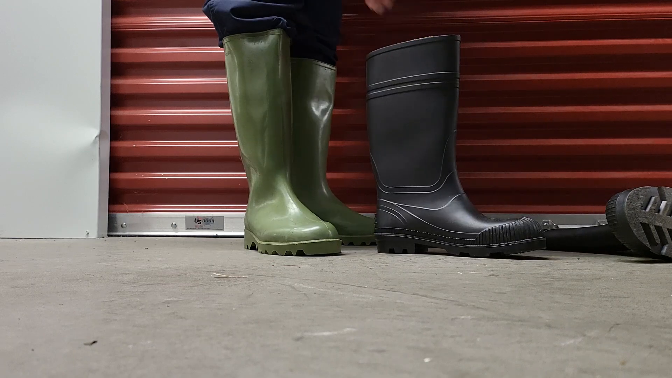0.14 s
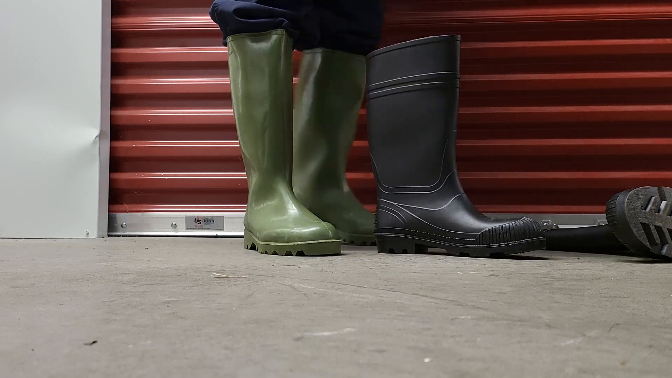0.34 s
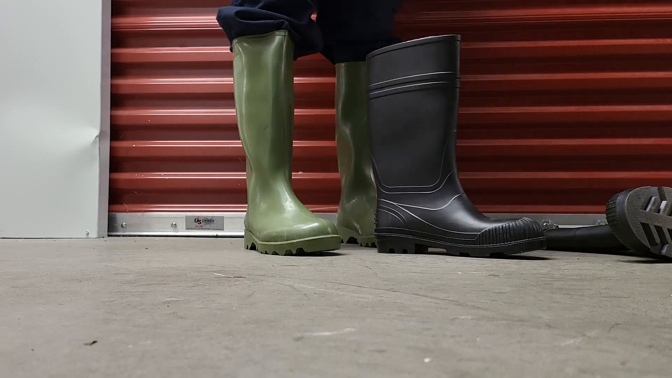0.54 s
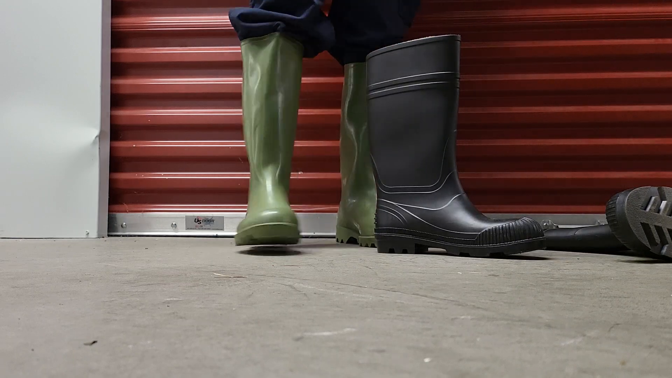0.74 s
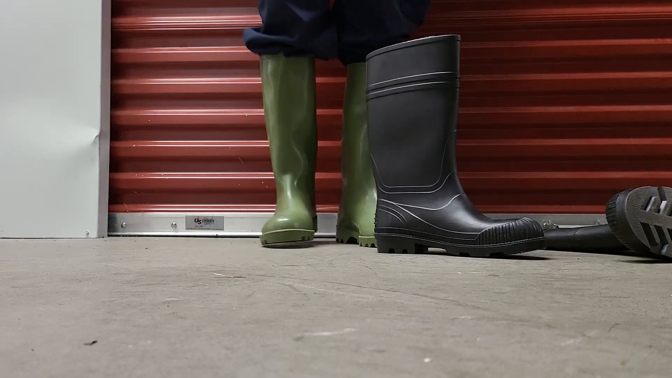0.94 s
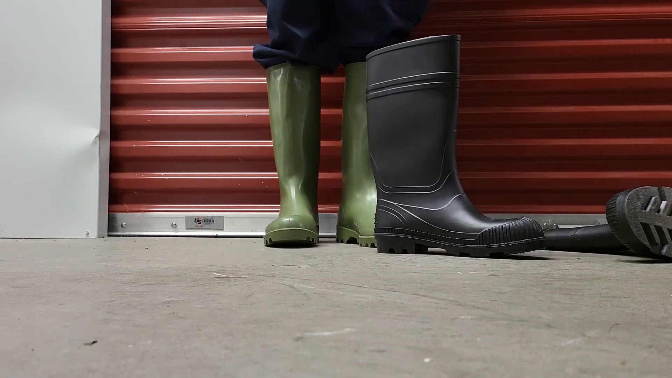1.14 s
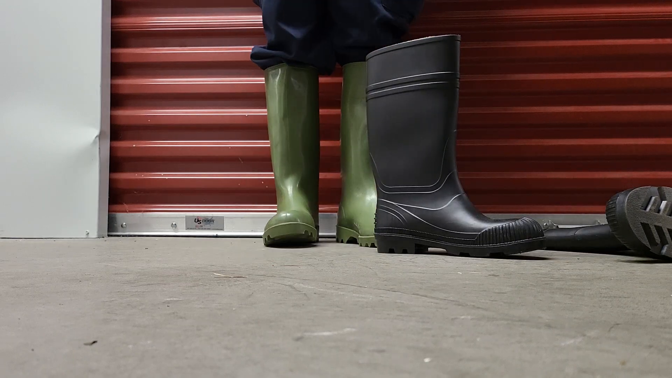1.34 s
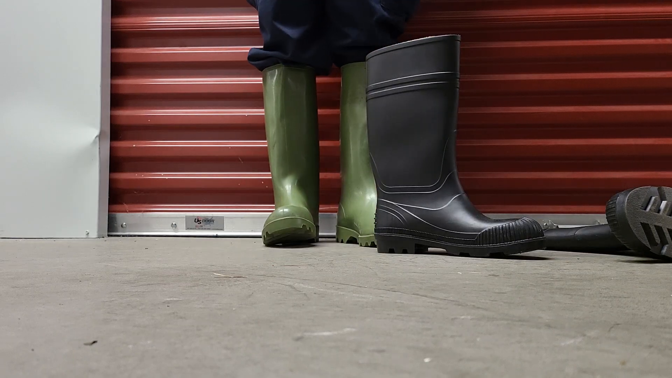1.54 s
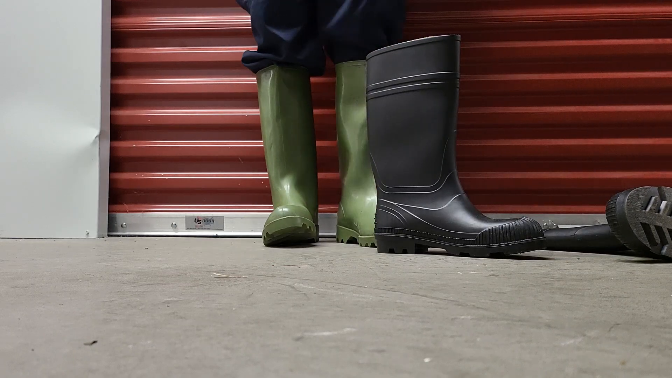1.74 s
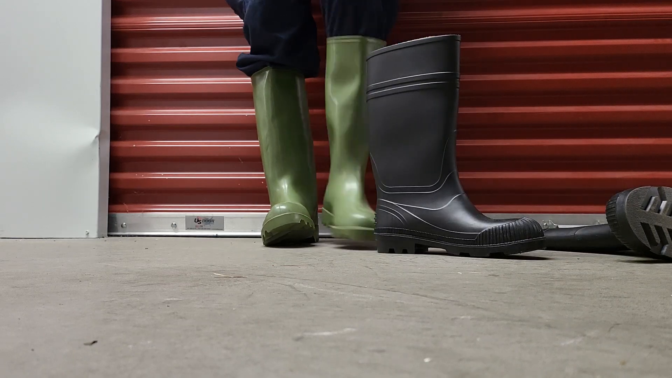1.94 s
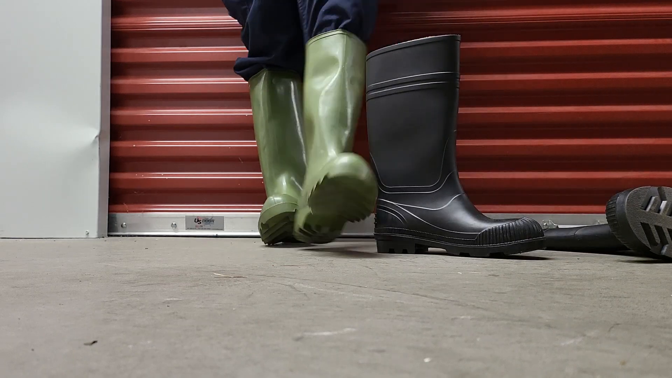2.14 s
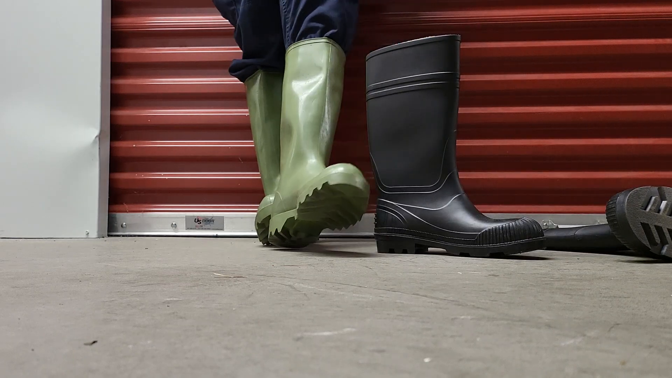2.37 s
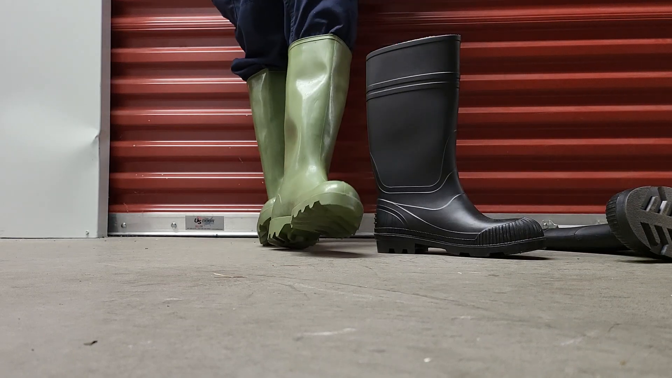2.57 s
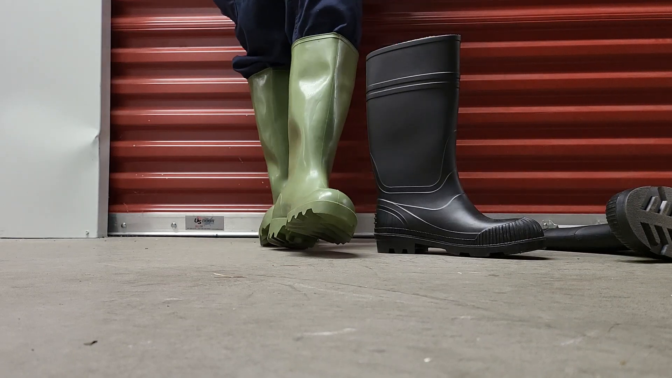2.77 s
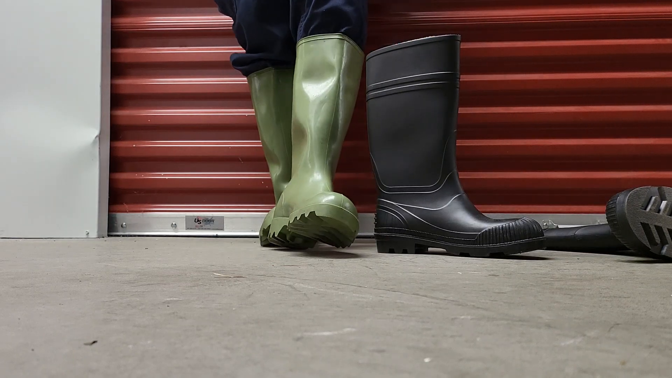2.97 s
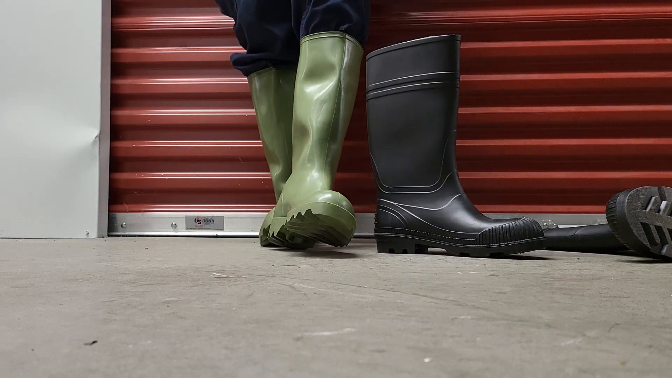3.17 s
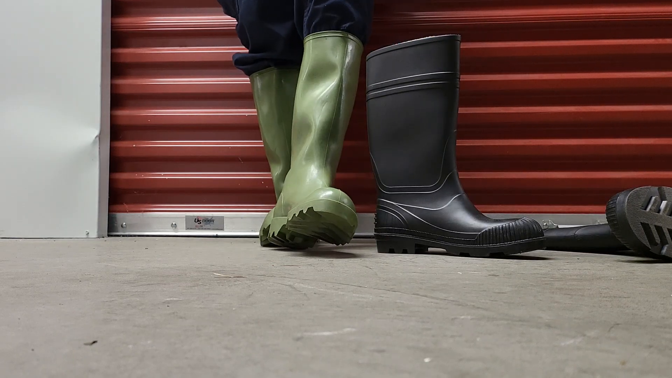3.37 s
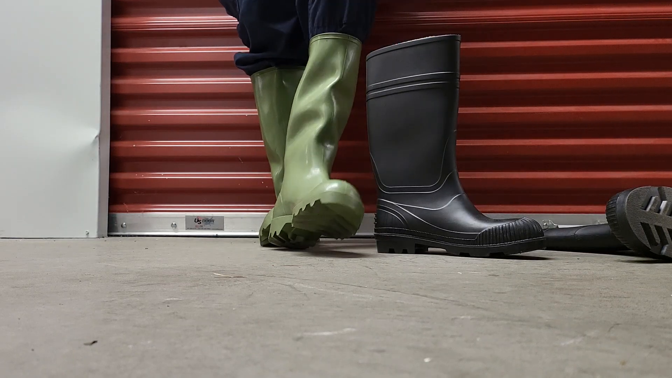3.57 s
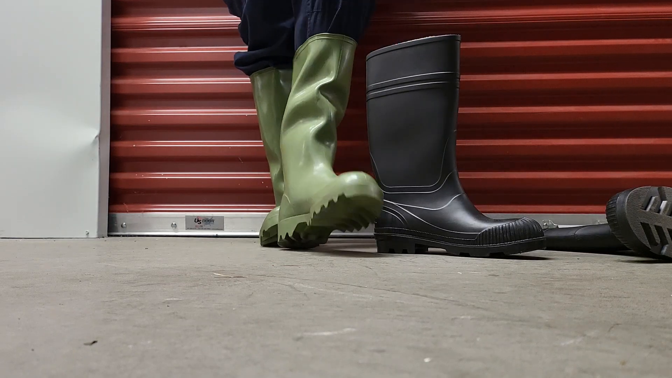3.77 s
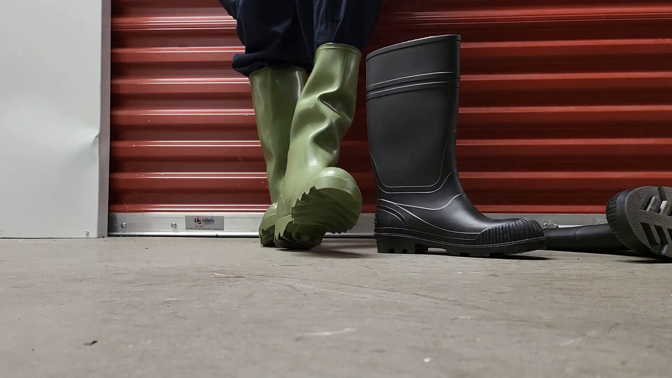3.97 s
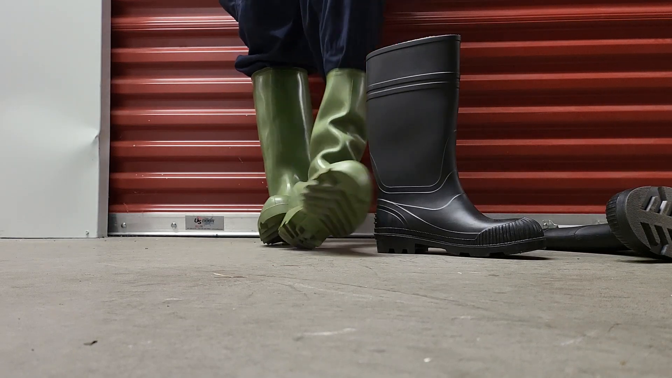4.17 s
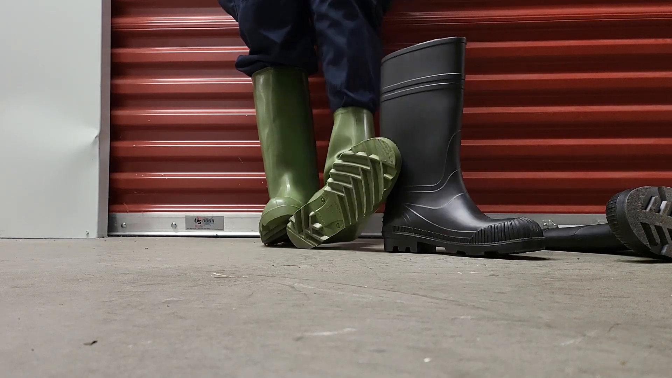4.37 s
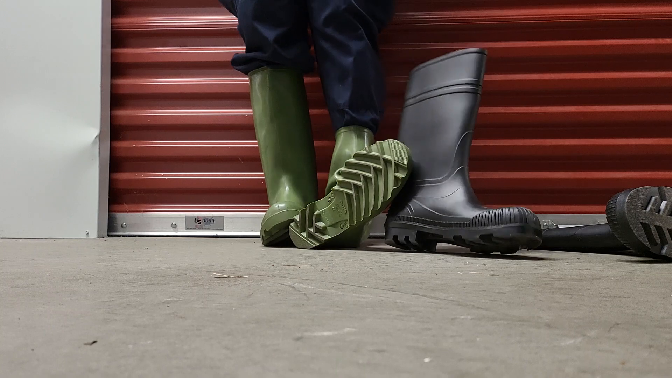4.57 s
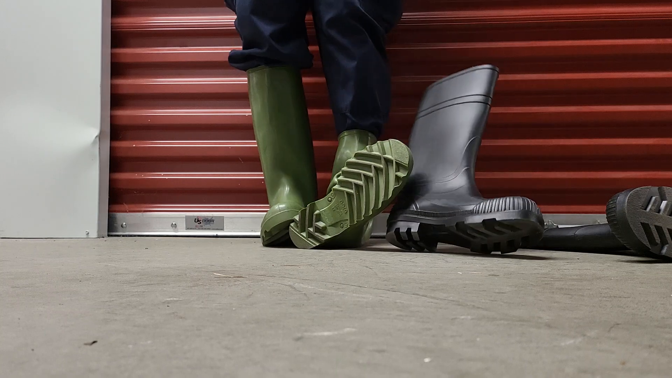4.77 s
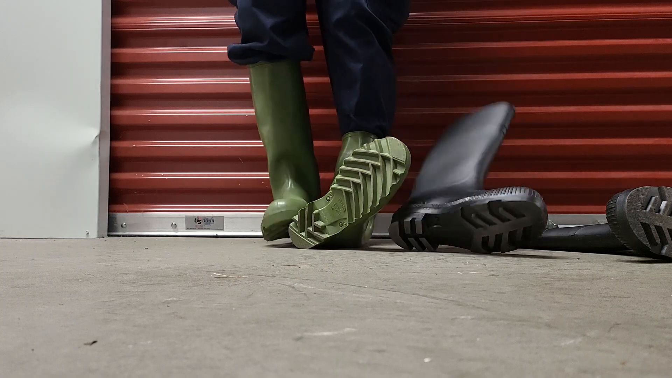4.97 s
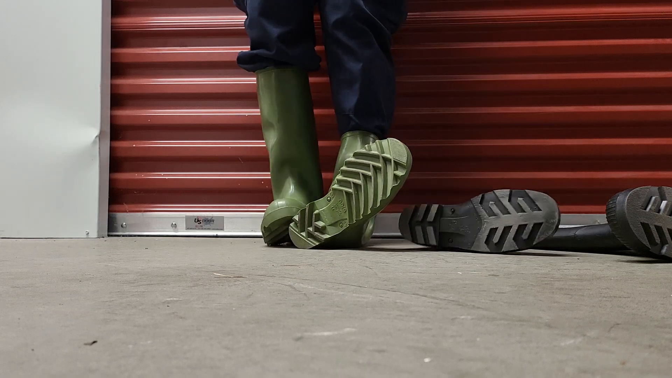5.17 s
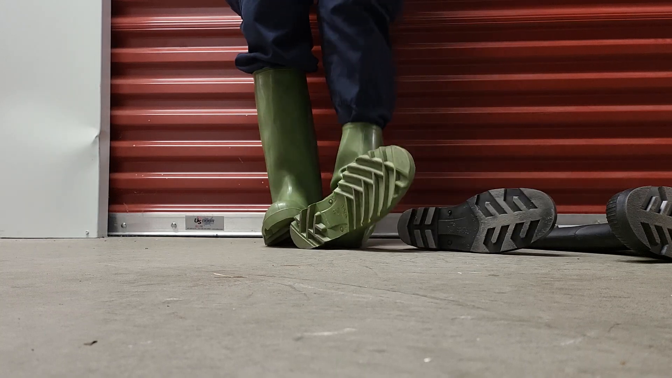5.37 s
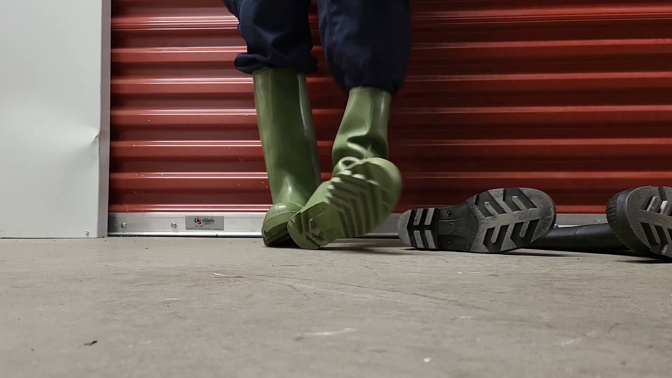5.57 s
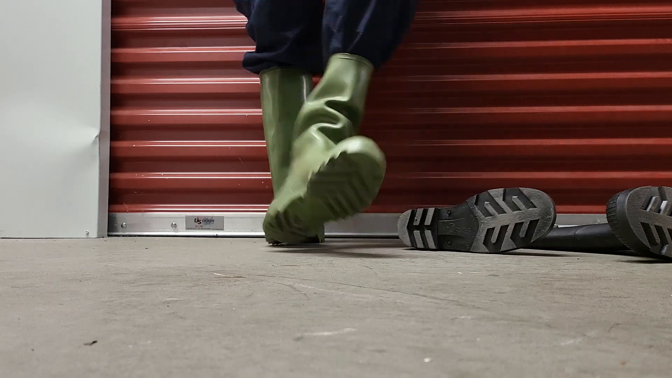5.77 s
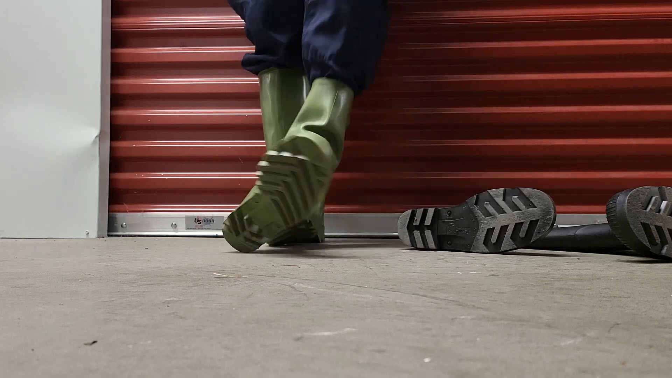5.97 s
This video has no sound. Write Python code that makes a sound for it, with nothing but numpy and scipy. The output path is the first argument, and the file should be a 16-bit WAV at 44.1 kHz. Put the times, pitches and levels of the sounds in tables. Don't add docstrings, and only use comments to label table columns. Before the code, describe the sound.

Rubber boots on a concrete floor, about two metres away in a bare, hard corridor. Low traffic and engine hum behind. Soft shuffling, small chirps and cloth rustle come first, then a dull heel thump, levering scuffs and a rising rubbery groan that stops dead. After a short squeak and light knocks, a spare boot falls with a loud hollow double slap, followed by grinding, creaking rubber.

```python
import sys
import numpy as np
from scipy import signal
from scipy.fft import rfft, irfft
from scipy.io import wavfile
from scipy.ndimage import uniform_filter1d

SR = 44100
rng = np.random.default_rng(int(sys.argv[2]) if len(sys.argv) > 2 else 0)


def ratio_of_db(decibels):
    return 10 ** (np.asarray(decibels, float) / 20)


def wav_out(sig):
    wavfile.write(sys.argv[1], SR, np.round(np.clip(np.atleast_2d(sig).T, -1, 1) * 32767).astype(np.int16))


N = 265482
TIME = np.arange(N) / SR

# frequency in Hz, level in dB.
TRAFFIC_TONE = [(8.8, -51), (15, -27), (54, 0), (92, -1.5), (155, -3.5), (269, -23), (371, -23.5),
                (559, -40.5), (685, -35.5), (917, -49.5), (2620, -51.5), (5130, -64.5), (7720, -59.5),
                (8670, -75.5), (16000, -64.5)]
# frequency in Hz, level in dB.
TRAFFIC_WIDTH = [(30, -25.0), (140, -15.5), (300, -2.5), (700, 5.0), (16000, -5.5)]
# time in seconds, pitch in Hz, level in dB.
ENGINE = [
    (0.0, 130.3, -55.5),
    (0.5, 133.7, -49),
    (0.66, 137.2, -60),
    (0.8, 139, -50),
    (1.64, 153.8, -46.5),
    (2.3, 160.3, -52.5),
    (2.94, 147, -49),
    (3.26, 130.8, -52.5),
    (3.35, 121, -52),
]
# time in seconds, dip in seconds, return in seconds, depth in dB.
ENGINE_MISSES = [
    (1.72, .04, .03, 14),
    (2.46, .09, .04, 14),
]
# time in seconds, pitch in Hz, level in dB.
FAN = [
    (3.75, 190, -58.5),
    (3.85, 194.6, -66.5),
    (4.864, 201, -61),
    (4.91, 199.7, -57.5),
    (5.25, 196, -71.5),
]
# centre in Hz, decay time T60 in seconds, level in dB.
ROOM = [(223, 0.41, -12.5), (600, 0.46, -12), (1390, 0.16, -6), (3740, 0.4, -17), (6000, 0.25, -9.5),
        (12200, 0.12, -7.5)]
# frequency in Hz, level in dB.
TAIL_WIDTH = [(100, -12), (300, -3), (600, 2), (1500, -1), (4000, -5), (8000, 0), (16000, -2)]
# frequency in Hz, level in dB.
BOUNCE = [(680, 0), (800, -4), (950, -1), (1520, -0.5), (1720, -6.5), (1950, 0.5), (2850, -1.5), (3500, -1),
          (5000, 0)]

# frequency in Hz, level in dB.
CLOTH_TONE = [(2650, -37.5), (4500, -15.5), (5190, -17), (5590, -2.5), (7690, 1), (9020, -9.5),
              (15000, -11.5), (16000, -12.5)]
# peak in seconds, rise in seconds, fall in seconds, level in dB.
RUSTLE = [(.5, 0.24, 0.36, -77.5), (.632, 0.082, 0.12, -67.5), (.896, 0.31, 0.045, -68.5),
          (1.068, 0.24, 0.022, -79.5), (1.16, 0.1, 0.11, -80.5), (1.58, 0.027, .3, -88),
          (1.672, 0.17, 0.036, -68.5), (1.81, 0.053, 0.29, -67), (1.96, 0.25, 0.13, -69),
          (2.27, .06, 0.19, -79), (2.804, 0.036, 0.18, -62.5), (3.016, 0.4, 0.021, -71.5),
          (3.756, 0.58, 0.34, -78), (3.93, 0.087, 0.019, -63), (4.18, 0.0079, 0.013, -54.5),
          (4.47, 0.048, 0.2, -71.5), (4.75, 0.48, 0.034, -80), (4.774, 0.0053, 0.0076, -61.5),
          (4.9, 0.1, 0.031, -84), (5.084, 0.015, 0.032, -69), (5.554, 0.044, 0.063, -58),
          (5.754, 0.43, 0.037, -75), (5.898, 0.05, 0.054, -70)]
# start and end in seconds, first and last pitch in Hz,
# width in Hz, level in dB.
SWEEPS = [
    (.845, .903, 3200, 6000, 1300, -63),
    (.85, .897, 2300, 4200, 900, -65),
]
# middle in seconds, length in seconds, pitch in Hz, level in dB.
SHORT_NOTES = [(0.444, 0.1, 1420, -68.5), (0.46, 0.052, 3600, -71), (0.714, 0.067, 1950, -67),
               (0.841, 0.097, 2065, -66), (.815, 0.044, 2530, -61), (0.502, 0.046, 980, -71),
               (0.612, .02, 1740, -69), (0.655, 0.026, 2540, -56), (.648, 0.024, 1100, -54),
               (3.29, 0.14, 325, -48.5), (3.36, .1, 330, -47.5), (3.55, 0.085, 211, -48),
               (4.188, .035, 360, -43), (4.185, .022, 1110, -48), (4.185, .02, 1980, -50), (5.68, .2, 640, -60),
               (5.72, .16, 880, -64), (5.331, 0.024, 3300, -35), (5.35, 0.078, 3900, -49),
               (1.49, .04, 2970, -74.5), (.654, .02, 3200, -59.5), (3.4, 0.01, 2000, -58),
               (2.274, 0.066, 1076, -62), (2.786, 0.059, 3250, -55), (2.962, 0.053, 2500, -63),
               (2.957, 0.085, 1500, -66), (4.684, 0.045, 139, -49), (1.905, 0.026, 2040, -62),
               (2.028, 0.036, 1700, -66), (2.689, 0.053, 622, -46), (2.768, 0.065, 385, -43.5),
               (2.6, .08, 2220, -76), (2.867, 0.087, 3700, -58), (2.939, 0.045, 1330, -55),
               (2.5, 0.024, 2290, -79), (4.535, 0.065, 2280, -63), (5.6, 0.12, 1400, -72),
               (5.087, 0.044, 6480, -62.5), (5.517, 0.13, 211, -47), (5.545, 0.1, 1400, -52.5),
               (5.55, 0.077, 2050, -54.5), (5.556, 0.035, 5600, -59), (5.912, 0.1, 653, -49),
               (5.927, 0.076, 500, -51), (5.97, 0.13, 1300, -70.5)]
# time in seconds, level in dB.
SQUEAK = [
    (4.172, -52),
    (4.176, -41),
    (4.186, -39),
    (4.215, -92),
]
# frequency in Hz, level in dB.
SQUEAK_TONE = [(180, -36), (300, -12), (370, 8.5), (678, -15.5), (1090, -0.5), (1400, -5.5), (1990, -4),
               (2500, -8), (2860, -9.5), (3290, -16), (4280, -15), (4970, -26), (6000, -29), (7800, -80),
               (13200, -120)]

# time in seconds, peak in dB, ring in Hz, slap in dB, crack in dB.
KNOCKS = [(0.645, -41, 372, 0.5, -20), (0.995, -61, 366.5, 9.5, -12), (1.119, -78.5, 431, 19, 0),
          (1.889, -47.5, 656, -9, -31), (1.945, -52, 990, -3, -26), (2.259, -46, 646, -16, -41),
          (2.612, -55, 688, -14, -24.5), (2.645, -55, 600, -13, -26), (2.679, -51, 614, -25, -40),
          (2.73, -41, 610, -7.5, -34), (2.991, -48, 891, -11, -6), (3.009, -42.5, 1146, -13, -5.5),
          (3.453, -40.5, 620, -5.5, -17), (4.432, -43, 650, -2.5, -25), (4.466, -49, 1000, -2, -20),
          (4.481, -49, 676, 6, -19), (4.505, -46, 639.6, 0, -21), (4.611, -56, 479, -1, -24),
          (4.665, -44.5, 580, -7, -10), (4.697, -43, 640, -8, -20), (4.741, -45, 626, -12, -19),
          (4.774, -39.5, 520, -7.5, -17), (4.87, -46.5, 660, -13, -32), (5.046, -55, 640, -12, -7),
          (5.089, -55.5, 690, -8, 5.5), (5.153, -59, 371, 7.5, -7), (5.179, -49.5, 426, 5, -10)]
HEEL = [
    (2.4226, -35, 485, -36, -59),
    (2.423, -41.5, 1005, -12, -58),
]
FALL = [
    (5.302, -44, 1340, -18, -23),
    (5.3148, -20, 940, -7, -3.5),
    (5.3158, -20, 700, -9, -9.5),
    (5.318, -23, 1450, -6, -8),
    (5.327, -25, 3280, 5, 0.5),
    (5.3285, -23.5, 1450, -2, -4),
    (5.3285, -18, 600, -4, 3),
]
# frequency in Hz, level in dB.
CRACK_TONE = [(1290, -30), (2200, -42), (2690, -6.5), (3360, 3.5), (4380, -4), (5910, -4.5), (8800, -19),
              (13900, -22.5), (16000, -30)]
# frequency in Hz, decay time T60 in
# seconds, level in dB.
SHAFT = [(214, 0.17, 15), (600, 0.34, 8.5), (302, 0.14, 5), (139, 0.12, -1), (365, 0.11, 5),
         (79.7, 0.27, -0.5)]

# time in seconds, slip rate in Hz, level in dB.
GROAN = [
    [(3.17, 79.23, -53), (3.3, 76.06, -46), (3.402, 81.86, -42), (3.443, 89.67, -44.5),
     (3.477, 94.03, -42.5), (3.591, 119.1, -43), (3.613, 122, -46), (3.643, 122.4, -43.5),
     (3.655, 121.3, -77)],
]
# frequency in Hz, level in dB.
GROAN_TONE = [(88, -36), (150, -1), (210, 1), (270, -8), (309, 2), (360, -1), (394, -2.5), (654, -9.5),
              (784, -22), (948, -10.5), (1300, -28.5), (1690, -53), (2860, -120)]
# frequency in Hz, decay time T60 in seconds, level in dB.
RASP_MODES = [(760, .03, -6), (980, .03, 0), (1380, .025, 0), (2000, .03, -3), (2550, .025, -4),
              (3100, .02, -8)]

# frequency in Hz, width in Hz, level in dB.
BOOT = [(1055, 140, -1), (1381, 310, -0.5), (2035, 225, -0.5), (2070, 28, -13.0), (2520, 190, -2.5),
        (3160, 140, -12.0), (3365, 71, -10), (3640, 170, -6.0), (4340, 290, -16.5), (356.0, 66, 9.0),
        (485.0, 41, -2.0), (610, 164, -2)]
# peak in seconds, rise in seconds, fall in seconds, level in dB.
FLEX = [(.522, 0.23, 0.018, -70.5), (.65, 0.13, 0.16, -61), (.89, 0.31, 0.17, -65),
        (1.162, 0.052, 0.033, -69), (1.28, 0.083, 0.11, -76), (1.592, 0.16, .06, -77),
        (1.86, 0.095, .4, -69), (1.944, 0.22, 0.26, -63.5), (2.11, 0.027, 0.013, -63),
        (2.3, 0.052, 0.019, -62), (2.43, 0.055, 0.082, -55.5), (2.8, 0.19, 0.22, -48.5),
        (2.99, 0.2, 0.02, -53), (3.01, 0.0095, 0.049, -59.5), (3.272, 0.055, 0.43, -50.5),
        (3.63, 0.35, 0.053, -48.5), (3.716, 0.14, 0.21, -50.5), (3.88, 0.097, 0.13, -50),
        (4.07, 0.081, 0.17, -65), (4.49, 0.067, 0.21, -52.5), (4.774, 0.15, 0.098, -52),
        (4.894, 0.11, 0.075, -55), (5.03, 0.035, 0.0099, -59.5), (5.16, 0.11, 0.18, -61),
        (5.27, 0.12, 0.14, -65.5), (5.558, 0.096, 0.41, -47), (5.76, 0.37, 0.35, -54.5),
        (5.94, 0.27, 0.25, -53.5)]
SAND = [
    (.888, .05, 0.029, -55),
    (2.716, .008, .015, -73),
    (2.79, 0.046, 0.17, -62.5),
    (2.96, 0.023, 0.044, -56),
    (2.993, 0.0065, 0.012, -55),
    (3.6, 0.19, 0.074, -75),
    (5.1, 0.03, .04, -74),
    (5.36, .02, .12, -50),
]
INSTEP = [
    (3.5, 0.18, 0.23, -59),
    (3.9, 0.048, 0.042, -68),
    (5.57, .06, .3, -55),
    (5.78, 0.35, 0.13, -61),
    (5.93, .1, 0.22, -70),
]
WEIGHT = [
    (5.5, 0.081, 0.26, -58),
    (5.75, 0.42, 0.58, -51.5),
]
# peak, rise and fall
# in seconds, level in dB, grit above it in dB.
DRAGS = [(0.429, 0.22, 0.33, -77, 6.5), (.522, .08, 0.026, -67.5, -2), (.635, 0.13, 0.3, -68.5, -1),
         (0.654, 0.013, 0.027, -55, 0), (.82, 0.039, 0.099, -71.5, 12.5), (0.88, 0.087, 0.03, -73, 8),
         (.99, 0.26, 0.042, -69.5, -5.5), (1.162, 0.14, 0.11, -72.5, 1),
         (1.29, 0.088, 0.043, -70.5, -2.5), (1.592, 0.09, 0.046, -73.5, 1.5),
         (1.85, 0.18, 0.28, -68.5, 5.5), (1.944, 0.097, 0.15, -57.5, -5), (2.059, 0.29, 0.026, -71, 5.5),
         (2.27, 0.071, 0.23, -69.5, -3.5), (2.369, 0.065, 0.048, -77, -4),
         (2.798, 0.11, 0.18, -47, -3.5), (2.98, 0.12, 0.028, -62.5, 1), (3.011, 0.0062, 0.006, -45, -7),
         (3.27, 0.13, 0.4, -64, -16), (3.63, 0.4, 0.12, -56.5, -7.5), (3.714, 0.11, 0.25, -63, 7),
         (3.87, 0.05, 0.1, -53, -8.5), (3.935, 0.089, 0.009, -53, 2.5), (4.1, 0.19, 0.084, -75, 1),
         (4.449, 0.027, 0.15, -63, 3.5), (4.5, 0.061, 0.021, -65.5, 10.5), (4.76, 0.23, 0.073, -58, -4.5),
         (4.894, 0.083, 0.058, -72.5, 1.5), (5.049, 0.013, 0.097, -63, -2.5),
         (5.183, 0.0073, 0.011, -44.5, -7.5), (5.4, 0.065, 0.11, -58.5, 11), (5.559, 0.064, 0.028, -39, -5),
         (5.75, 0.52, 0.063, -58.5, -7), (5.894, 0.062, 0.075, -57, -3), (6.02, 0.081, .05, -70, -17)]

GROAN_STOP_S = 3.643


def unit(x):
    return x / np.sqrt(np.mean(x ** 2))


def curves(*tables):
    s, *columns = np.transpose(np.concatenate(tables))
    is_open = sum(1. * (TIME >= rows[0][0]) * (TIME <= rows[-1][0]) for rows in tables)
    gate = uniform_filter1d(is_open, size=300)
    return [np.interp(TIME, s, c) for c in columns] + [gate]


def strokes(table):
    t = TIME[::32]
    power = np.zeros(len(t))
    for s, rise, fall, db in table:
        distance = np.where(t < s, (s - t) / max(rise, .003), (t - s) / max(fall, .003))
        power += ratio_of_db(db - 20 * distance) ** 2
    return np.interp(TIME, t, np.sqrt(power))


def band(x, lo_hz, hi_hz, order=2):
    edges = [lo_hz, min(hi_hz, .45 * SR)]
    return signal.sosfilt(signal.butter(order, edges, "band", fs=SR, output="sos"), x)


def colour(x, tone):
    hz, db = np.transpose(tone)
    f = np.fft.rfftfreq(x.shape[-1], 1 / SR) + 1
    return irfft(rfft(x) * ratio_of_db(np.interp(np.log(f), np.log(hz), db)), x.shape[-1])


def ring(x, hz, t60):
    r = np.exp(-np.log(1000) / (max(t60, .002) * SR))
    turn = 2 * np.pi * hz / SR
    return signal.lfilter([np.sin(turn)], [1, -2 * r * np.cos(turn), r * r], x)


def walk(rate):
    k = int(SR / rate)
    held = np.repeat(rng.standard_normal(N // k + 1), k)
    return uniform_filter1d(uniform_filter1d(held, k), k)[:N]


def grains(rate, spread_db):
    when, sign, size = rng.random((3, N))
    return (when < rate / SR) * np.sign(sign - .5) * ratio_of_db(-spread_db * np.log(size + 1 / 200))


def bend(x):
    drift = .05 * walk(9)
    return np.interp(np.arange(N) + np.cumsum(drift - drift.mean()), np.arange(N), x)


def even(x, like):
    power = np.abs(rfft(like)) ** 2
    ratio = uniform_filter1d(power, size=900) / uniform_filter1d(power, size=50)
    c = irfft(np.log(ratio) / 2, len(like))
    c[1:len(c) // 2] *= 2
    c[len(c) // 2:] = 0
    return irfft(rfft(x) * np.exp(rfft(c)), len(like))


def rumble():
    hz = 77 + 9 * walk(14)
    return np.sqrt(2) * ratio_of_db(-54 + 4 * walk(7.3)) * np.sin(2 * np.pi * np.cumsum(hz) / SR)


def machine_note(table, wobble_db):
    hz, db, gate = curves(table)
    return np.sqrt(2) * ratio_of_db(db + wobble_db * walk(5.26)) * gate * np.sin(2 * np.pi * np.cumsum(hz) / SR)


def traffic():
    mid = colour(rng.standard_normal(N), TRAFFIC_TONE)
    side = colour(colour(rng.standard_normal(N), TRAFFIC_TONE), TRAFFIC_WIDTH)
    swell = ratio_of_db(-49.5 + 0.6 * walk(2.815)) / np.std(mid)
    engine = machine_note(ENGINE, 2.3) / (1 + strokes(ENGINE_MISSES))
    fan = machine_note(FAN, 2.7)
    return swell * np.array([mid + side, mid - side]) + engine + fan + rumble()


def corridor(x):
    t = np.arange(int(.9 * SR)) / SR
    noise = rng.standard_normal((2, len(t))) * np.minimum(t / .002, 1)
    early = noise * ratio_of_db(-60 * t / 0.039)
    tail = np.zeros((2, len(t)))
    for hz, t60, db in ROOM:
        late = noise * ratio_of_db(-9.5 - 60 * t / t60)
        tail += ratio_of_db(db) * band(early + late, hz / 1.6, hz * 1.6, order=1) / 8
    mid, side = tail
    side = 1.11 * colour(side, TAIL_WIDTH)
    response = np.array([mid + side, mid - side]) / np.sqrt(2)
    response[0, 0] += 1
    response[1, 4] += 1
    return signal.fftconvolve(x[None], even(response, response.mean(axis=0)), axes=1)[:, :N]


def rustle():
    return strokes(RUSTLE) * ratio_of_db(1.2 * walk(29.85)) * unit(colour(grains(7700, 4.27), CLOTH_TONE))


def sweeps():
    out = np.zeros(N)
    for start, end, from_hz, to_hz, width_hz, db in SWEEPS:
        part = np.clip((TIME - start) / (end - start), 0, 1)
        carrier = np.sin(2 * np.pi * np.cumsum(from_hz + (to_hz - from_hz) * part) / SR)
        hiss = unit(band(rng.standard_normal(N), 20, width_hz / 2)) * carrier
        out += ratio_of_db(db) * hiss * strokes([(end, 1.3 * (end - start), .012, 0)])
    return out


def short_notes():
    noise, out = rng.standard_normal(N), np.zeros(N)
    for s, length, hz, db in SHORT_NOTES:
        at = slice(max(int((s - length / 2) * SR), 0), int((s + length / 2) * SR))
        note = band(noise[max(at.start - 4000, 0):at.stop], hz * .965 - 10, hz * 1.035 + 10)
        note = note / np.sqrt(uniform_filter1d(note ** 2, size=700) + .15 * note.var())
        swell = np.cos((TIME[at] - s) / length * np.pi) ** 2
        out[at] += ratio_of_db(db) * swell * note[-len(TIME[at]):]
    return out


def slips(hz, uneven):
    cycle = np.floor(np.cumsum(hz * (1 + uneven * 2.4 * walk(70))) / SR)
    return np.diff(cycle, prepend=0) * ratio_of_db(40 * uneven * walk(90))


def squeak():
    db, gate = curves(SQUEAK)
    judder = unit(slips(np.full(N, 363.9), .045)) + ratio_of_db(-5) * rng.standard_normal(N)
    return ratio_of_db(db) * gate * unit(colour(judder, SQUEAK_TONE))


def knocks(table, rise, t60, shaft_db):
    out, t = np.zeros(N + SR // 2), np.arange(SR // 2) / SR
    push = np.exp(-t / 0.0002)
    thud = sum(ratio_of_db(mode_db) * ring(push, f, d) for f, d, mode_db in SHAFT)
    fade = ratio_of_db(-60 * t / t60) * np.minimum(t / rise, 1)
    for s, db, hz, slap_db, crack_db in table:
        noise = rng.standard_normal(len(t))
        hollow = ring(band(noise * fade * np.exp(-t / 0.003), hz / 2, hz * 2), hz, t60)
        slap = band(noise * fade, 1020, 2480, order=4)
        crack = fade * colour(noise, CRACK_TONE)
        parts = (hollow, 0), (slap, slap_db), (crack, crack_db), (thud, shaft_db)
        hit = sum(ratio_of_db(part_db) * part / np.abs(part).max() for part, part_db in parts)
        i = int(s * SR)
        out[i:i + len(t)] += ratio_of_db(db) * hit
    return out[:N]


def groan():
    hz, db, gate = curves(*GROAN)
    uneven = np.clip((115 - hz) / 40, .12, 1)
    phase = 2 * np.pi * np.cumsum(hz * (1 + .11 * uneven * walk(60))) / SR
    dark_db = -6.5 * np.clip((3.46 - TIME) / 0.089, 0, 1)
    tone_hz, tone_db = np.transpose(GROAN_TONE)
    upper = np.zeros(N)
    for k in range(2, 14):
        level_db = np.interp(np.log(k * hz), np.log(tone_hz), tone_db)
        level_db = level_db + dark_db * np.abs(np.log2(k * hz / 340)) + (2 + 6 * uneven) * walk(40)
        upper += ratio_of_db(level_db) * np.sin(k * phase + rng.uniform(0, 2))
    upper = upper / np.sqrt(uniform_filter1d(upper ** 2, size=2000) + 1e-12)
    pulse = .05 + np.exp(-(phase / (2 * np.pi) % 1) / .025)
    tugs = (1.5 + rng.standard_normal(N)) * pulse * ratio_of_db(2.5 * walk(80))
    modes = sum((-1) ** k * ratio_of_db(mode_db) * ring(tugs, f, d) for k, (f, d, mode_db) in enumerate(RASP_MODES))
    rasp = unit(band(modes, 650, 4000))
    upper = upper + ratio_of_db(-16.5 + 12.0 * (0.5 - uneven)) * rasp
    upper = upper * np.clip((TIME - 3.16) / 0.042, 0, 1)
    lowest = ratio_of_db(db - 4) + strokes([(GROAN_STOP_S, .1, .012, -37)])
    return gate * (ratio_of_db(db) * upper + lowest * np.sqrt(2) * np.sin(phase))


def rubbed_boot():
    slip = grains(3500, 3) * ratio_of_db(2.4 * walk(60))
    out = ratio_of_db(-16.5) * slip
    for k, (hz, width, db) in enumerate(BOOT):
        mode = bend(ring(slip, hz, np.log(1000) / (np.pi * width)))
        out += (-1) ** k * ratio_of_db(db + 3 * walk(14)) * np.pi * width / SR * mode
    return out


def shaft_flex(rub):
    freed = ratio_of_db(-6.5 * (TIME > GROAN_STOP_S))
    hollow = unit(band(rub, 200, 424) * freed - band(rub, 422, 904))
    return strokes(FLEX) * hollow


def sole_drag(rub):
    drags = np.array(DRAGS)
    grit_rows = np.c_[drags[:, :3], drags[:, 3:].sum(axis=1)]
    sole = strokes(drags[:, :4]) * unit(band(rub, 793, 1746))
    grit = strokes(grit_rows) * unit(band(rub, 1315, 4480))
    instep = strokes(INSTEP) * unit(band(rub, 720, 950))
    weight = strokes(WEIGHT) * unit(band(rub, 113, 252))
    return sole + grit + instep + weight


def scene():
    inner, outer = rubbed_boot(), rubbed_boot()
    sand = strokes(SAND) * unit(band(inner, 3050, 5500))
    rubbing = shaft_flex(inner) + sole_drag(outer) + sand + rustle()
    steps = knocks(KNOCKS + HEEL, rise=0.0023, t60=0.021, shaft_db=-14.5)
    topple = knocks(FALL, rise=0.00079, t60=0.019, shaft_db=-9.0)
    near = rubbing + groan() + squeak() + short_notes() + sweeps() + steps + topple
    return corridor(colour(near, BOUNCE)) + traffic()


def top_cut(x):
    return signal.sosfilt(signal.butter(12, 15900, fs=SR, output="sos"), x)


def record(dry):
    return top_cut(dry)


dry = scene()
out = record(dry)
wav_out(out)
```